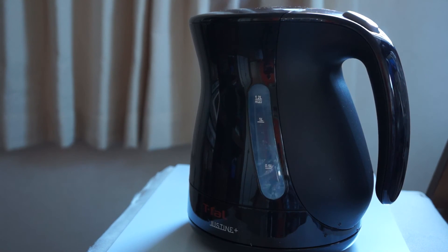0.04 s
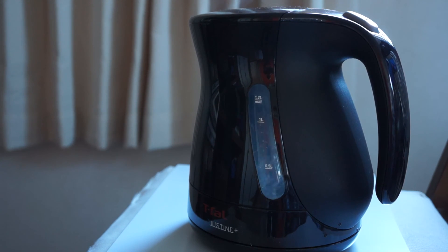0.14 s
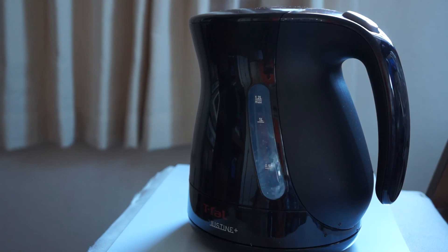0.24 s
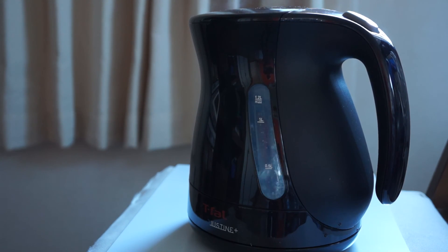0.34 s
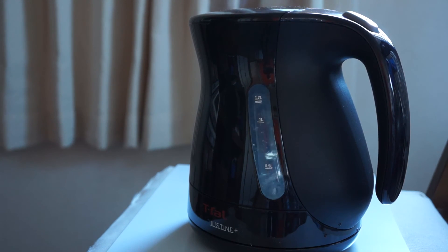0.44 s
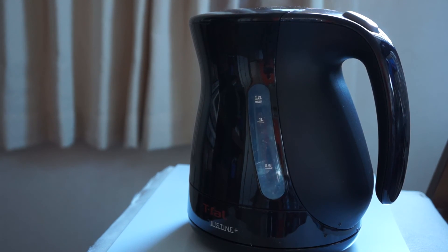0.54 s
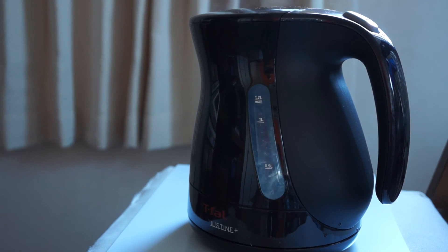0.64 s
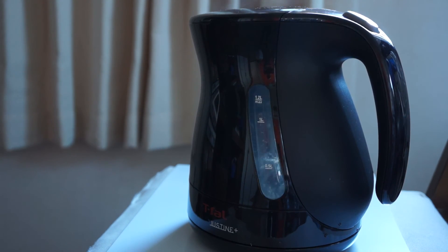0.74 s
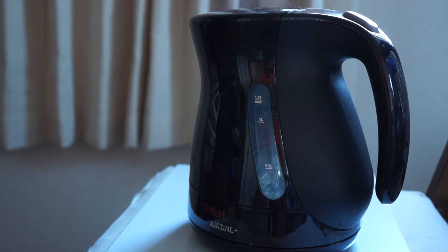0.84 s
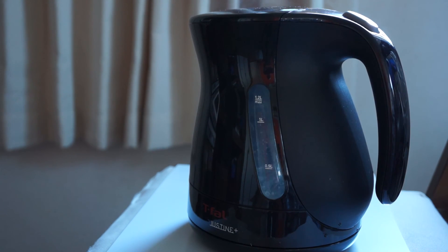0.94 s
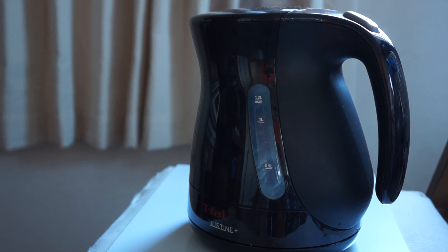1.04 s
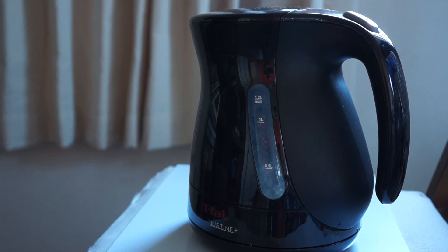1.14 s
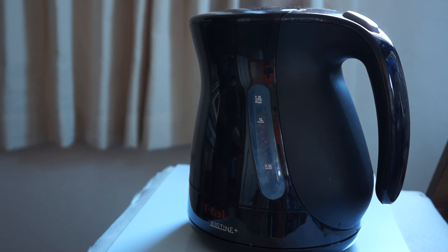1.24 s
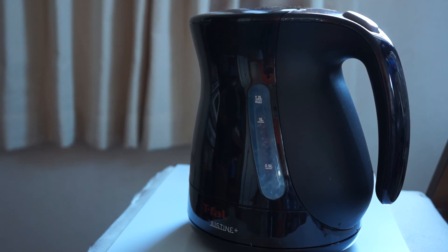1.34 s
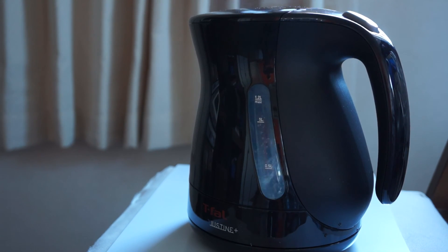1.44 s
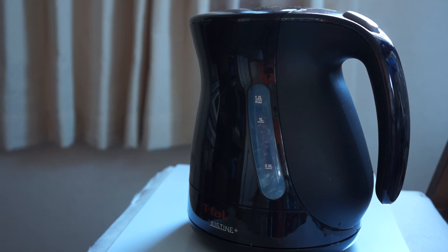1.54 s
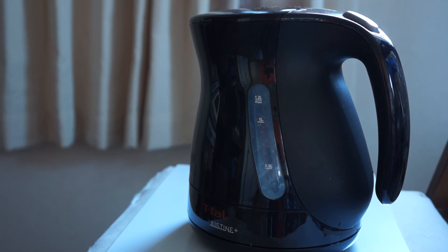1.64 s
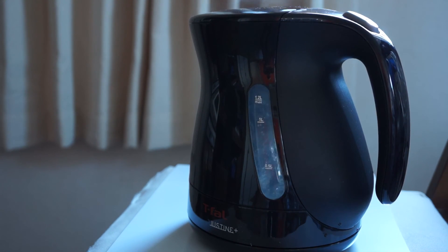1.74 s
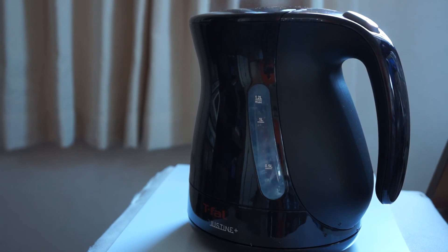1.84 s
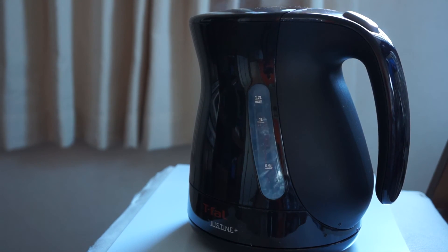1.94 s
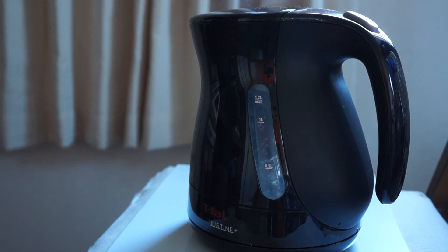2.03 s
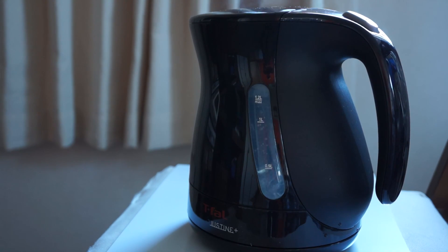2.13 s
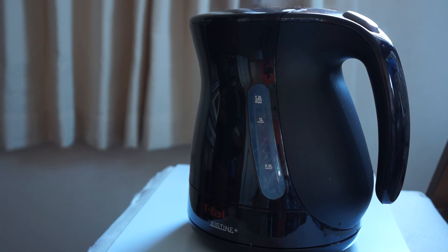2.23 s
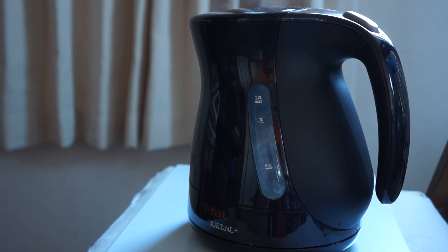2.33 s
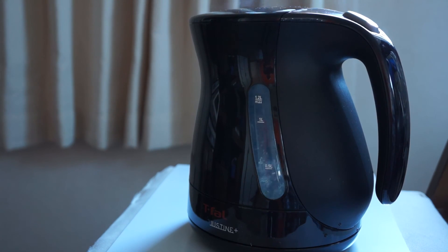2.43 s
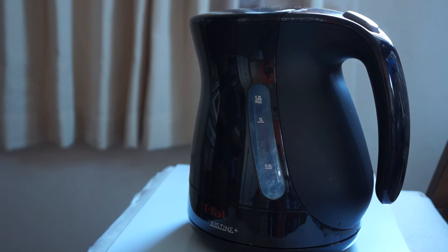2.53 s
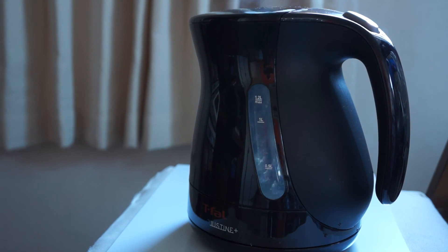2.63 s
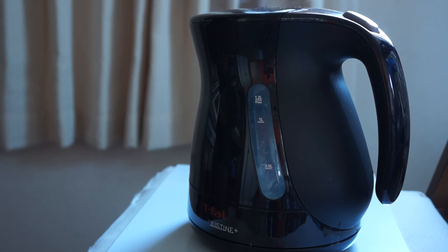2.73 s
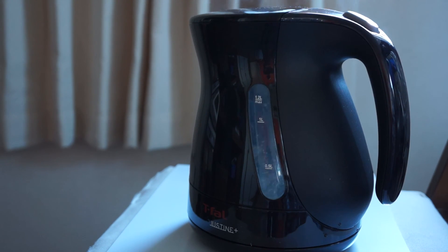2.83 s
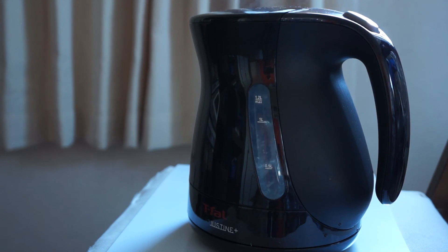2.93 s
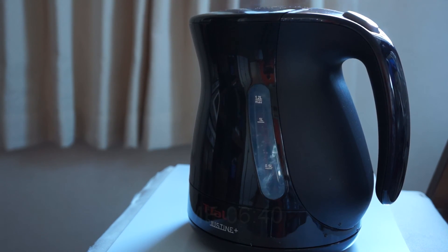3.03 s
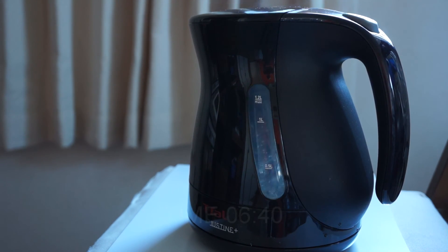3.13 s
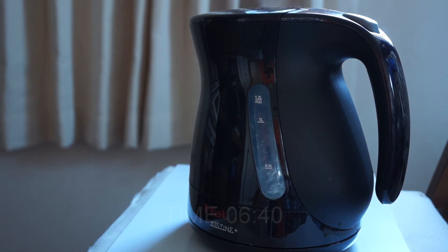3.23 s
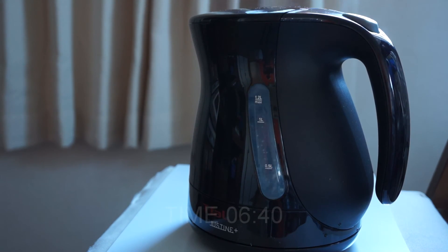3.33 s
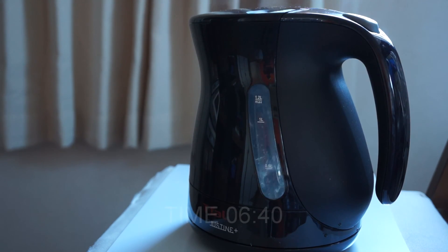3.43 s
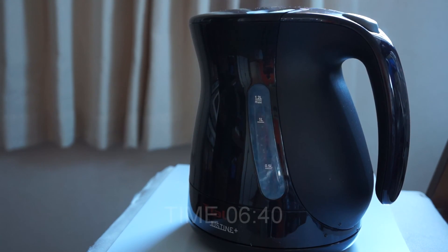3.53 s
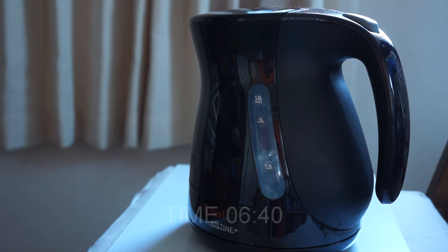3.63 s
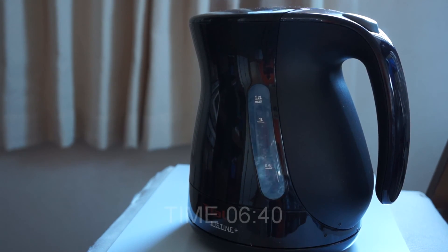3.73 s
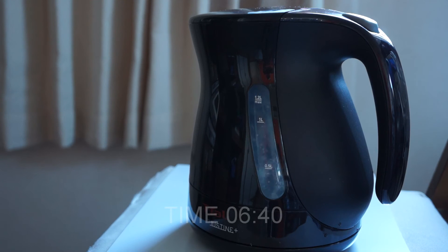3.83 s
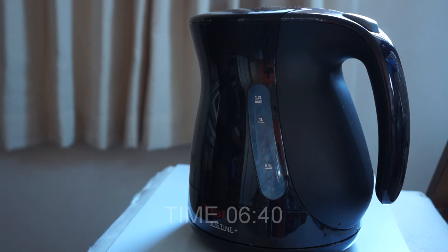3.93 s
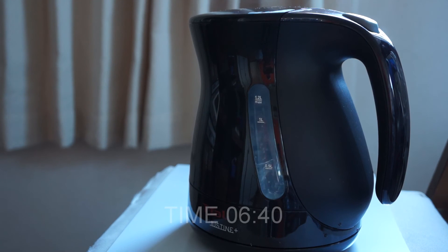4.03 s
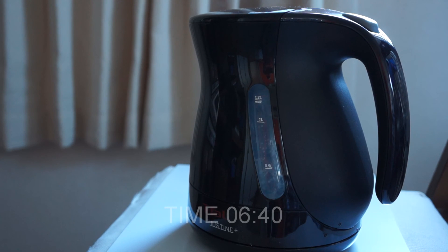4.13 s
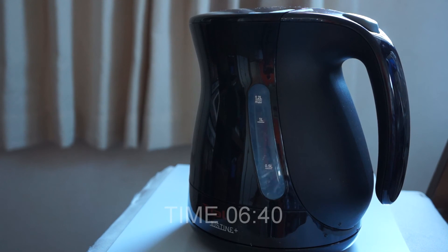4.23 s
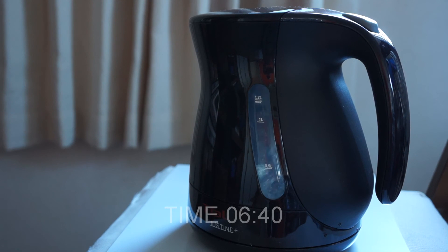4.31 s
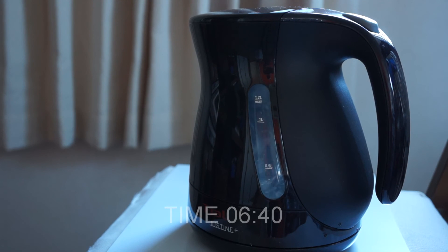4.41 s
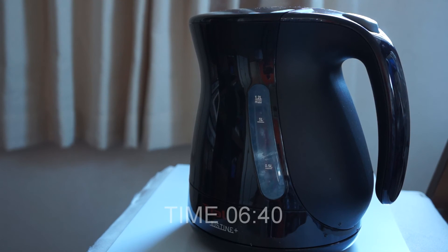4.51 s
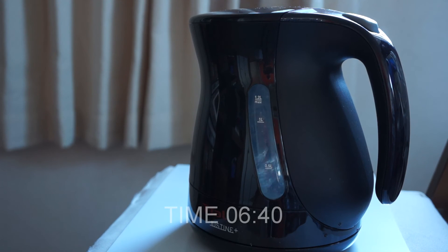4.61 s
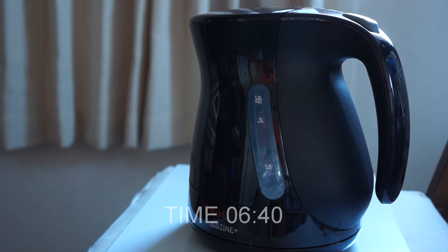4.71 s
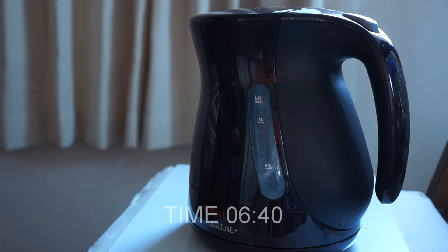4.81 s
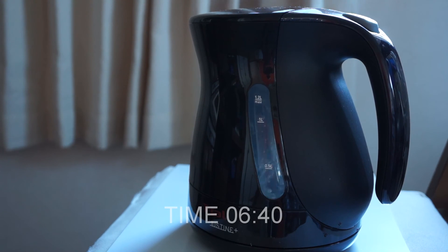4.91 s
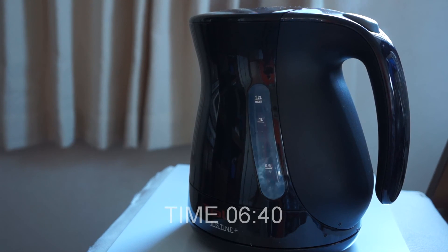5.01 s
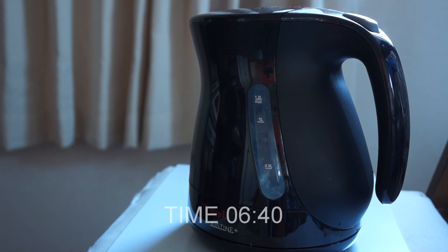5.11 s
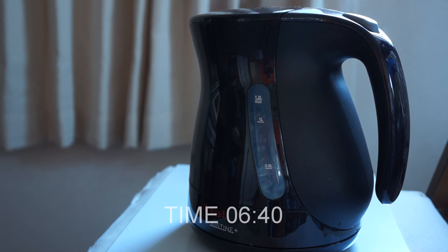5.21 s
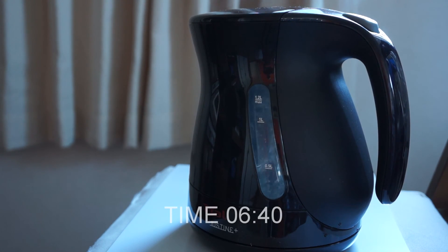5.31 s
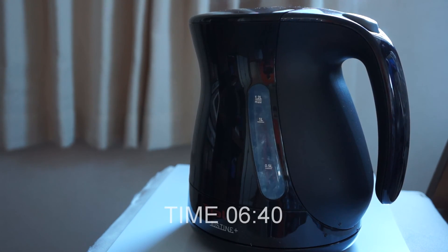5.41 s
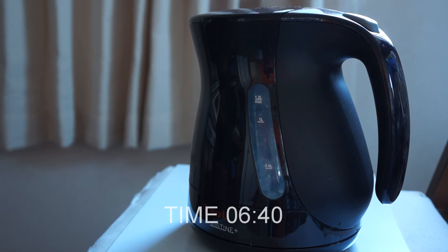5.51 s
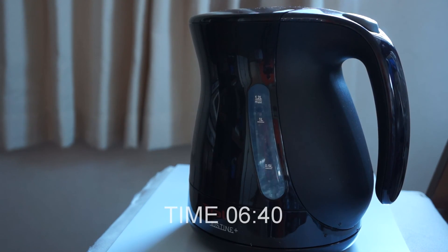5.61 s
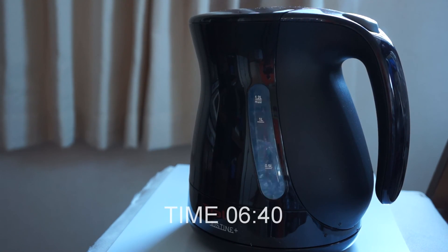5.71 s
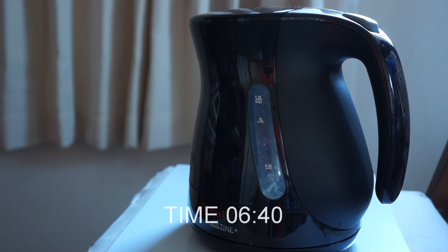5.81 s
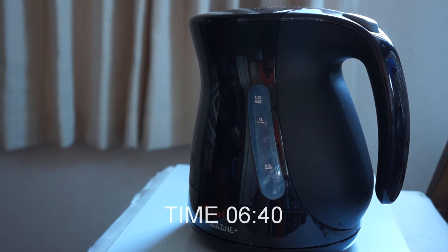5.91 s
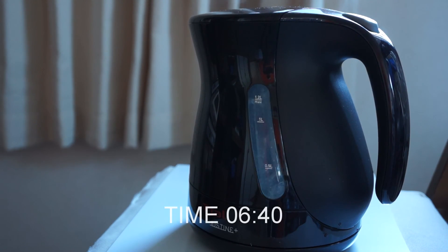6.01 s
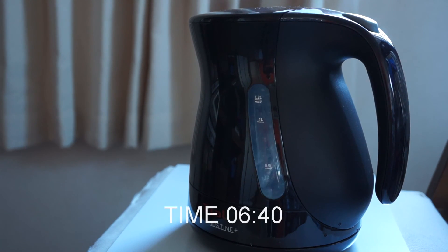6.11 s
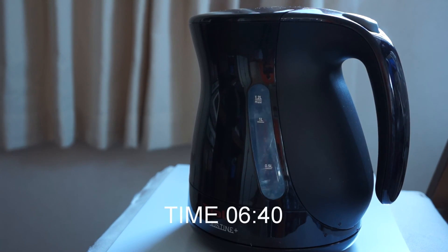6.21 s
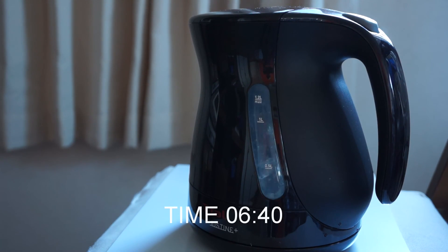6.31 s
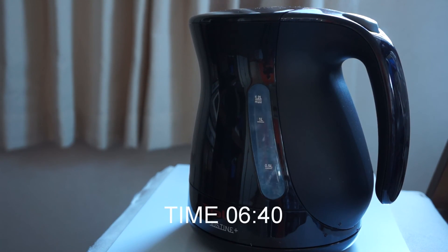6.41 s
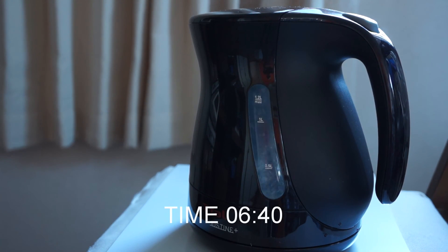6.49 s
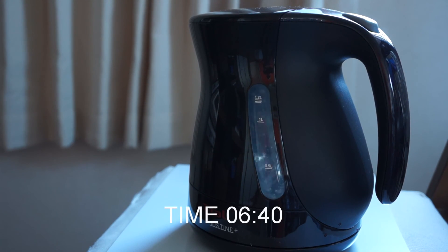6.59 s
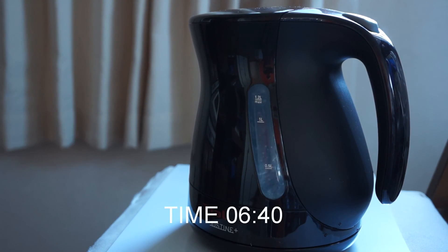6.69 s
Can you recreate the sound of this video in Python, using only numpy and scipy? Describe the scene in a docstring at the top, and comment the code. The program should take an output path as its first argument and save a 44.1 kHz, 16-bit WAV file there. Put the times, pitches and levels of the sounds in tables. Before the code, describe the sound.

From 0 s a plastic electric kettle is already at full boil, close up in a small room. A dense swarm of ringing bubbles, strongest around 300 to 550 Hz, churns steadily beneath splashing and a thin, flickering fizz that builds slightly. Rounded glugs stand out at about 0.3, 1.1, 1.5 and repeatedly from 2.3 to 3.1 s, among brighter wet pops. Dry little ticks snap from the shell near 0.8, 1.3 and 1.5 s, with a sharper one at 2.2 s. At 3.17 s a faint release leads within milliseconds into a loud, hard plastic clack with a short hollow ring, by far the loudest event. The boil continues unabated until about 4.4 s, then eases a few decibels by 6.5 s, with glugs, pops and ticks near 3.75 and 5.65 s. Low hum, drone and soft room noise lie beneath; a final pop comes near 6.4 s.

```python
"""A rolling boil in a plastic electric kettle, heard close up in a small room: a swarm of ringing bubbles churns,
drops and noise splash, filtered noise fizzes, and single glugs and pops stand out as pitched bubbles.
Noise bursts tick from the hot shell; the switch snaps off with one loud clack of cracks and ringing jug modes.
The plate's stored heat holds the boil a moment, then it eases. Hum, drone and steady noise lie beneath."""
import sys
import numpy as np
from scipy import signal
from scipy.fft import rfft, irfft, next_fast_len
from scipy.io import wavfile
from scipy.ndimage import map_coordinates

SR = 44100
rng = np.random.default_rng(int(sys.argv[2]) if len(sys.argv) > 2 else 0)


def digitize_waveform(pressure):
    """Quantize a signal to 16-bit integers and store it at the path in sys.argv[1].

    Rows of a 2-D input are taken as channels; values are limited to [-1, 1].
    """
    field = np.atleast_2d(pressure).T
    bounded = np.clip(field, -1, 1)
    quanta = np.round(bounded * 32767).astype(np.int16)
    wavfile.write(sys.argv[1], SR, quanta)


N = 297675

# steady noise, relative spectrum: pitch_hz, level_db
FLOOR_SPECTRUM = [(20, 13), (40, 1), (62, 21), (100, 22), (160, 15.5), (400, 26), (1500, 12.5), (6000, 0),
                  (12000, -1), (16000, -2)]
# likeness of left and right in the steady noise: pitch_hz, likeness (1 = identical)
FLOOR_LIKENESS = [(25, .5), (55, .1), (130, 1), (1000, 0.84), (5000, 0.32), (14000, 0.039)]
# reverberation of the small room: pitch_hz, t60_s
ROOM_DECAY = [(150, 0.18), (600, 0.26), (1500, 0.36), (4500, 0.22), (10000, 0.13), (16000, 0.47)]
# low drone, relative spectrum: pitch_hz, level_db
DRONE_SPECTRUM = [(55, -38), (73, -21), (81, 1), (88, -7), (98, -16), (125, -61), (300, -120)]
# switch contacts (release, trip, stop, rebound): start_s, level_db, edge_db (crack gain within the contact)
SWITCH_CONTACTS = [(3.1746, -34, 19.5), (3.1783, -17.5, 6.5), (3.1799, -9, 6), (3.189, -36, 23)]
# ringing modes of the jug and its lid: pitch_hz, level_db, t60_s
JUG_MODES = [(320, -13, 0.059), (474, -0.5, 0.033), (558.8, -11, 0.16), (1414, -16, 0.064),
             (1405, 1.5, 0.027), (1920, -8, 0.016), (2090, -11, 0.036), (4520, -13, 0.027)]
# filter of a contact's sharp crack: pitch_hz, level_db
CRACK_SPECTRUM = [(100, -44), (200, -33), (310, -1), (600, 4.5), (1000, 0), (1450, 9.5), (2600, -1.5),
                  (3200, -6), (4300, 2), (6000, -10), (8000, -12.5), (11200, -10.5), (12500, -26),
                  (16000, -28)]
# filter of the shell's crowded modes: pitch_hz, level_db
SHELL_SPECTRUM = [(100, -19), (300, -4), (700, -8), (1000, -15), (1400, -3), (2200, 0), (3200, -2.5),
                  (4500, -2), (6000, -10.5), (9500, -15), (16000, -33)]
# sharp ticks of the hot kettle: start_s, level_db (peak before trim and room), pitch_hz
SHELL_TICKS = [(.801, -34, 3300), (0.823, -33, 3200), (1.284, -36, 4000), (1.456, -34, 3200),
               (2.1926, -21.5, 5200), (2.203, -37, 5400), (3.754, -29, 3600), (3.763, -26.5, 4200),
               (4.223, -39, 3000), (5.036, -40, 3500), (5.637, -26, 3500), (5.669, -26, 3300),
               (5.818, -38, 3500)]
# filter of a tick: pitch_hz, level_db
TICK_SPECTRUM = [(400, -10), (1200, -5), (2200, -1), (3200, 4), (5300, -3), (7000, -9), (11000, -10.5),
                 (12500, -29), (16000, -31)]
# biggest steam bubbles: start_s, level_db (peak before trim and room), pitch_hz
BIG_GLUGS = [(0.266, -28, 474), (1.064, -25.5, 464), (1.533, -29.5, 468), (2.268, -26.5, 450),
             (2.376, -24, 520), (2.594, -26.5, 471), (2.776, -26, 474), (3.09, -28.5, 452),
             (3.548, -32, 409), (3.716, -24, 450), (3.808, -26, 610), (4.299, -29.5, 474),
             (4.876, -28.5, 380), (5.441, -28, 466), (6.377, -28, 442)]
# loudest bubbles bursting at the surface: start_s, level_db (peak before trim and room), pitch_hz
SURFACE_POPS = [(0.362, -35, 1140), (0.38, -31.5, 1080), (0.631, -33, 1240), (0.656, -32, 1210),
                (0.708, -30, 880), (0.873, -32.5, 1320), (1.148, -33.5, 880), (1.284, -30.5, 1290),
                (1.313, -31, 853), (1.618, -27.5, 1760), (1.78, -32.5, 1290), (2.375, -33.5, 790),
                (3.01, -31.5, 2000), (3.595, -30, 1085), (3.946, -31, 834), (4.831, -29.5, 890),
                (4.981, -33.5, 1800), (5.051, -31, 880), (5.452, -35.5, 880), (5.818, -29.5, 1690),
                (5.925, -31, 1310), (6.391, -26, 960)]
# filter of a pop's spray: pitch_hz, level_db
POP_SPECTRUM = [(300, -22.5), (700, 4.5), (1200, 1.5), (1900, -0.5), (2500, -9.5), (4500, -23), (8000, -45),
                (16000, -50)]
# filter of the bubbles churning in the water: pitch_hz, level_db
CHURN_SPECTRUM = [(60, -41), (140, -26.5), (183, -12.5), (200, -18), (230, -9.5), (310, -4.5), (400, -1.5),
                  (480, 0.5), (530, -2), (620, -11), (850, -14.5), (1200, -41), (2500, -62.5)]
# filter of the splashing surface: pitch_hz, level_db
SPLASH_SPECTRUM = [(350, -22), (700, -1.5), (900, 1), (1130, -1.5), (1350, 6), (1550, -2.5), (1850, -1),
                   (2300, -9.5), (2700, -13), (4200, -10), (5200, -35), (7000, -23), (11000, -41)]
# filter of the tiniest bubbles: pitch_hz, level_db
FIZZ_SPECTRUM = [(1500, -3), (2600, -5.5), (3400, -1), (4300, -0.5), (5200, -5.5), (7000, -12),
                 (11000, -18)]

TOP_HZ = 15850  # nothing sounds above this
STORED_HEAT_S = 1.2  # the hot plate keeps the boil up this long after the switch releases
HUM_HZ, HUM_DB, HUM_WAVER_DB = 113, -61, 3.5
DRONE_DB, RUMBLE_EASE_DB_PER_S = -54.5, 1.5  # hum and drone both sink with the boil
SHELL_CUT_HZ = 200  # the small jug radiates little of a knock below this
TICK_GAIN_DB, TICK_T60_S = -0.5, 0.0076  # trim of all ticks, decay of the snap
TICK_RING_DB, TICK_RING_T60_S = -22, 0.12  # the shell rings on briefly after each tick
GLUG_GAIN_DB = -0.5  # trim of all glugs
POP_GAIN_DB, SPRAY_DB = 2, -2  # trim of all pops, spray within a pop
CHURN_DB, CHURN_EASE_DB_PER_S = -40, 1.56  # full boil, then the water calms
SPLASH_DB, SPLASH_EASE_DB_PER_S = -50, 1.14  # full boil, then the surface calms
POP_SPLASH_DB, POP_SPLASH_S = -0.5, 0.04  # small change of splash level after each pop, its time constant
CLUMPS_DB, CLUMPS_PER_S = 1.5, 45  # the splash comes in clumps: depth, rate
FIZZ_DB, FIZZ_GROWS_DB_PER_S, FIZZ_EASE_DB_PER_S = -64.5, 0.92, 2.5  # start, steady build-up, fall in cooling


def amp(db):
    """Decibels to gain."""
    return 10 ** (np.asarray(db) / 20)


def unit(x):
    """x at rms 1."""
    return x / np.sqrt(np.mean(x ** 2) + 1e-20)


def along(points, hz):
    """Read (pitch_hz, value) points on a log frequency axis."""
    f, v = np.transpose(points)
    return np.interp(np.log(hz + 1), np.log(f), v)


def wobble(rate):
    """A smooth random curve with rate knots a second."""
    knots = rng.standard_normal(int(N * rate / SR) + 4)
    return map_coordinates(knots, [np.arange(N) * rate / SR])


def filtered(x, response):
    """x shaped by a response of frequency."""
    m = next_fast_len(N + SR // 2)
    return irfft(rfft(x, m) * response(np.fft.rfftfreq(m, 1 / SR)), m)[..., :N]


def coloured(x, spectrum, size=4096):
    """x through a minimum-phase filter, so that nothing sounds ahead of an attack."""
    level_db = along(spectrum, np.fft.rfftfreq(size, 1 / SR))
    cepstrum = irfft(np.log(amp(level_db)))
    fold = np.r_[1, np.full(size // 2 - 1, 2), np.zeros(size // 2)]
    impulse = irfft(np.exp(rfft(cepstrum * fold)))
    return signal.fftconvolve(x, impulse)[:len(x)]


def fade(t, t60):
    """A decay of 60 dB in t60, in the units of t."""
    return np.exp(-np.log(1000) * t / t60)


def add(track, s, sound):
    """Mix a sound into the track at time s."""
    start = round(s * SR)
    track[start:start + len(sound)] += sound[:N - start]


def bubble(t, hz, cycles, rise, swell):
    """A bubble swells in over its first turns, then rings out while its pitch rises."""
    turns = hz * t
    tone = np.sin(2 * np.pi * turns * (1 + rise * turns / cycles))
    return tone * fade(turns, cycles) * (1 - np.exp(-(turns / swell) ** 2))


def swarm(rate, low_hz, high_hz, cycles, spread_db):
    """Random bubbles, rate a second, of all sizes between two pitches, with an even spectrum."""
    when, size, strength, sign = rng.random((int(rate * N / SR), 4)).T
    hz = low_hz * (high_hz / low_hz) ** size
    strength_db = -spread_db * np.log(np.clip(strength, .02, 1))  # a few bubbles stand out
    gain = hz * amp(strength_db) * np.sign(sign - .5)
    k = np.arange(int(SR * cycles / low_hz))
    grains = gain[:, None] * bubble(k / SR, hz[:, None], cycles, rise=0.049, swell=0.28)
    places = (when * N).astype(int)[:, None] + k
    return np.bincount(places.ravel(), grains.ravel(), N)[:N]


def cooling_time():
    """Seconds since the plate's stored heat ran out, zero before, for every sample."""
    return np.maximum(np.arange(N) / SR - SWITCH_CONTACTS[0][0] - STORED_HEAT_S, 0)


def in_room(x, wet_db, width):
    """The direct sound plus the answer of table and walls, a decaying noise tail wider in the treble."""
    hz, t, z = signal.stft(rng.standard_normal((2, SR // 2)), SR, nperseg=256)
    decaying = z * fade(t, along(ROOM_DECAY, hz)[:, None])
    tail = signal.istft(decaying, SR, nperseg=256)[1]
    t = np.arange(tail.shape[1]) / SR
    tail *= (1 - np.exp(-(t / 0.0026) ** 2)) * (1 + 0.67 * fade(t, 0.35))  # near walls answer first
    mid, side = signal.fftconvolve(x[None], tail / np.linalg.norm(tail[0]), axes=1)[:, :N]
    side = width * filtered(side, lambda hz: hz / np.hypot(hz, 1500))
    return x + amp(wet_db) * np.array([mid + side, mid - side])


def background():
    """Steady room noise and hiss, its mid and side shares set by the left-right likeness."""
    def mid_side(hz):
        turn = np.arccos(np.clip(along(FLOOR_LIKENESS, hz), -1, 1)) / 2
        return amp(along(FLOOR_SPECTRUM, hz)) * [np.cos(turn), np.sin(turn)]
    mid, side = filtered(rng.standard_normal((2, N)), mid_side)
    return amp(-49.0) * unit(np.array([mid + side, mid - side]))


def rumble():
    """The boil shakes the table: a wavering hum alike in both ears, a low noise drone opposite in them."""
    hum_phase = 2 * np.pi * HUM_HZ * np.arange(N) / SR + 2.3 * wobble(13)
    hum = amp(HUM_DB + HUM_WAVER_DB * wobble(7)) * np.sin(hum_phase)
    drone = amp(DRONE_DB) * unit(coloured(rng.standard_normal(N), DRONE_SPECTRUM))
    return amp(-RUMBLE_EASE_DB_PER_S * cooling_time()) * np.array([hum + drone, hum - drone])


def ticks():
    """Brief snaps of the hot shell, each lifted around a pitch of its own, with a faint ring."""
    track, t = np.zeros(N), np.arange(SR // 8) / SR
    for s, db, hz in SHELL_TICKS:
        snap = rng.standard_normal(len(t)) * fade(t, TICK_T60_S) * (1 - np.exp(-t / 0.0011))
        ring = amp(TICK_RING_DB) * rng.standard_normal(len(t)) * fade(t, TICK_RING_T60_S)
        pitched = signal.lfilter(*signal.iirpeak(hz, 1.5, fs=SR), snap + ring)
        tick = coloured(1.1 * snap + pitched, TICK_SPECTRUM)
        add(track, s, amp(db + TICK_GAIN_DB) * tick / np.abs(tick).max())
    return track


def switch():
    """The sprung lever trips and hits its stop; every contact cracks and rings the jug."""
    track, t = np.zeros(N), np.arange(SR // 2) / SR
    ring = np.zeros(len(t))
    for hz, db, t60 in JUG_MODES:
        ring += amp(db) * fade(t, t60) * np.sin(2 * np.pi * (hz * t + rng.random()))
    ring *= 1 - np.exp(-t / 0.00069)
    for s, db, edge_db in SWITCH_CONTACTS:
        crack = coloured(rng.standard_normal(len(t)) * fade(t, 0.019), CRACK_SPECTRUM)
        shell = coloured(rng.standard_normal(len(t)) * fade(t, 0.23), SHELL_SPECTRUM)  # many crowded modes
        add(track, s, amp(db) * (ring + amp(edge_db) * crack + amp(-10.0) * shell))
    high_pass = signal.butter(3, SHELL_CUT_HZ, "high", fs=SR, output="sos")
    return signal.sosfilt(high_pass, track)


def glugs():
    """Single big bubbles deep in the jug, each a ringing tone that rises slightly."""
    track, t = np.zeros(N), np.arange(SR // 10) / SR
    for s, db, hz in BIG_GLUGS:
        glug = bubble(t, hz, cycles=10.2, rise=0.026, swell=1.05)
        add(track, s, amp(db + GLUG_GAIN_DB) * glug / np.abs(glug).max())
    return track


def pops():
    """Domes of steam break at the surface, each a short bubble tone with a burst of spray noise."""
    track, t = np.zeros(N), np.arange(SR // 10) / SR
    for s, db, hz in SURFACE_POPS:
        spray = coloured(rng.standard_normal(len(t)) * fade(t, 0.033), POP_SPECTRUM)
        spray = signal.lfilter(*signal.butter(2, 2 * hz, fs=SR), spray)  # a larger bubble throws a duller spray
        tone = bubble(t, hz, cycles=18, rise=0.029, swell=0.39)
        pop = tone + amp(SPRAY_DB) * spray / np.abs(spray).max()
        add(track, s, amp(db + POP_GAIN_DB) * pop / np.abs(pop).max())
    return track


def fizz():
    """The tiniest bubbles blur into flickering noise that builds up, then falls as the plate cools."""
    build_up_db = FIZZ_GROWS_DB_PER_S * np.arange(N) / SR
    level_db = FIZZ_DB + build_up_db - FIZZ_EASE_DB_PER_S * cooling_time() + 1.9 * wobble(60)
    return amp(level_db) * unit(coloured(rng.standard_normal(N), FIZZ_SPECTRUM))


def splash():
    """Small bubbles over a bed of noise splash at the surface in clumps."""
    t = np.arange(N) / SR
    after_pops = [(t > s) * np.exp(-np.abs(t - s) / POP_SPLASH_S) for s, db, hz in SURFACE_POPS]
    pop_splash_db = POP_SPLASH_DB * np.max(after_pops, axis=0)
    clumps_db = CLUMPS_DB * wobble(CLUMPS_PER_S)
    level_db = SPLASH_DB - SPLASH_EASE_DB_PER_S * cooling_time() + pop_splash_db + clumps_db
    drops = unit(swarm(rate=500, low_hz=604, high_hz=2920, cycles=9.7, spread_db=3.5))
    bed = amp(5.0) * rng.standard_normal(N)
    return amp(level_db) * unit(coloured(drops + bed, SPLASH_SPECTRUM))


def churn():
    """Large bubbles ring in the water as a dense swarm that calms as the plate cools."""
    level_db = CHURN_DB - CHURN_EASE_DB_PER_S * cooling_time() + 0.4 * wobble(6.4)
    bubbles = swarm(rate=1400, low_hz=150.5, high_hz=1098, cycles=9.5, spread_db=1.4)
    return amp(level_db) * unit(coloured(bubbles, CHURN_SPECTRUM))


def scene():
    """The kettle stands slightly to the right, over the rumble and the background."""
    boil = churn() + splash() + fizz()
    water = in_room(boil + glugs() + pops(), wet_db=-11.5, width=0.92)
    shell = in_room(ticks(), wet_db=-5.0, width=0.67) + in_room(switch(), wet_db=-9.0, width=0.99)
    return (water + shell) * amp([[-.7], [.7]]) + rumble() + background()


def record(dry):
    """Round off the highest peaks smoothly and keep nothing above the band limit."""
    held = dry / (1 + np.abs(dry / .85) ** 6) ** (1 / 6)
    return filtered(held, lambda hz: hz < TOP_HZ)


dry = scene()
out = record(dry)
digitize_waveform(out)
```